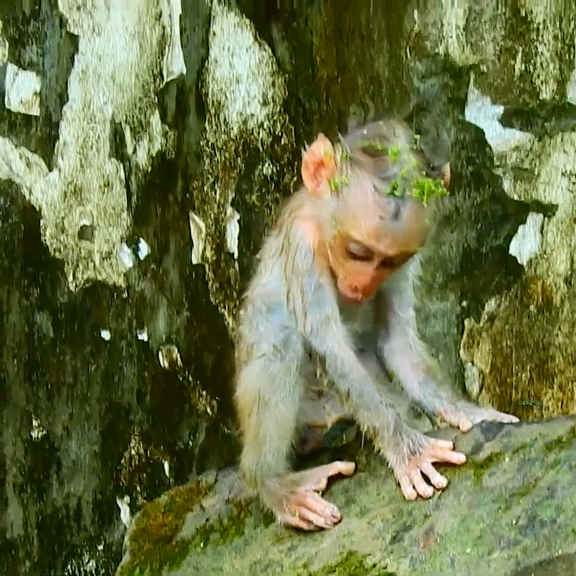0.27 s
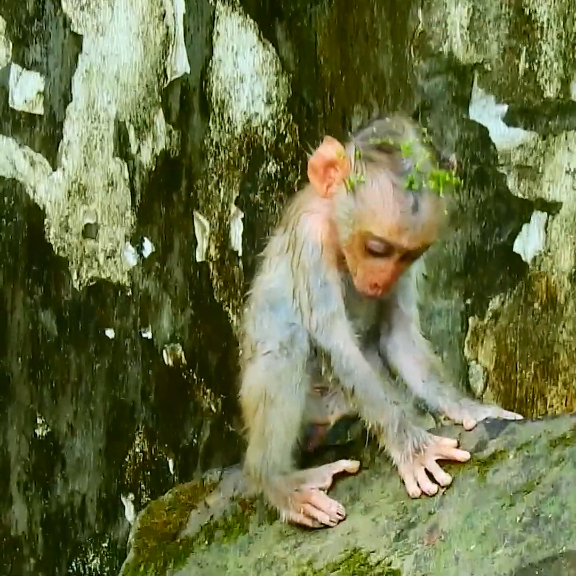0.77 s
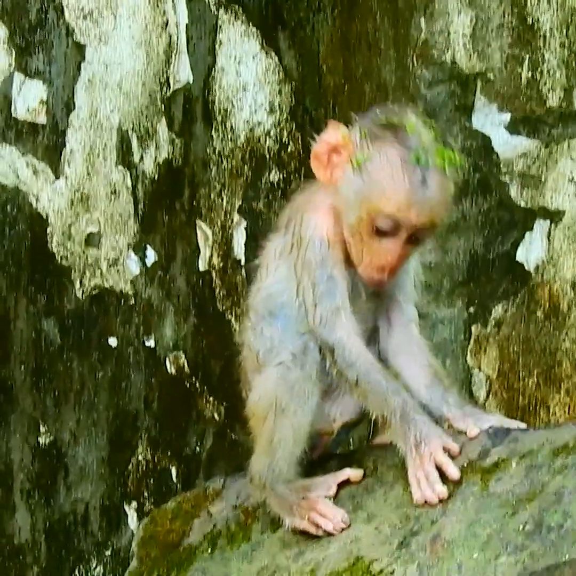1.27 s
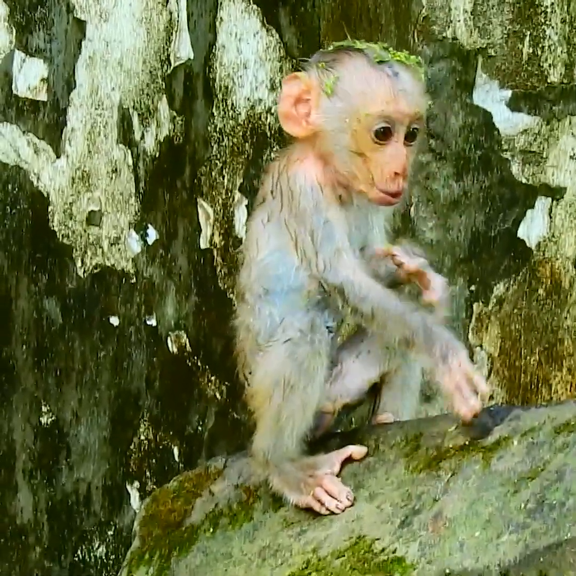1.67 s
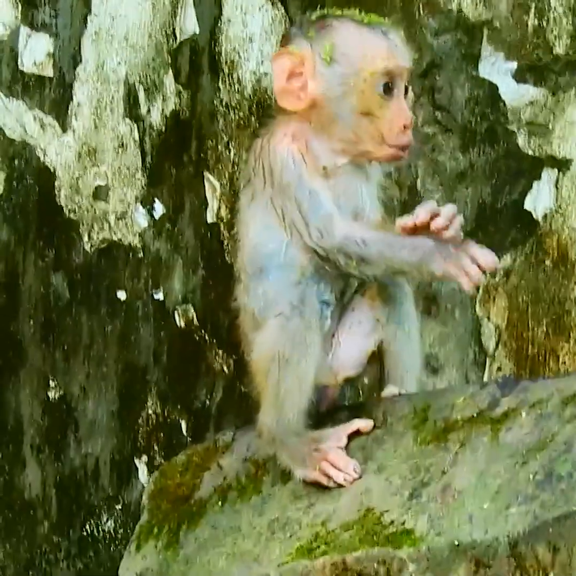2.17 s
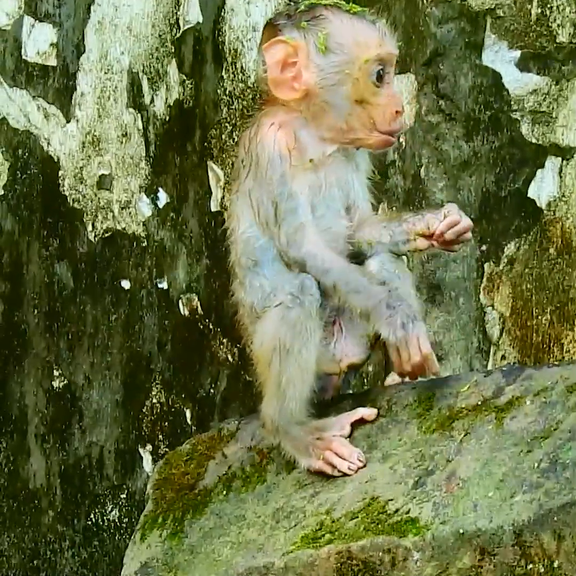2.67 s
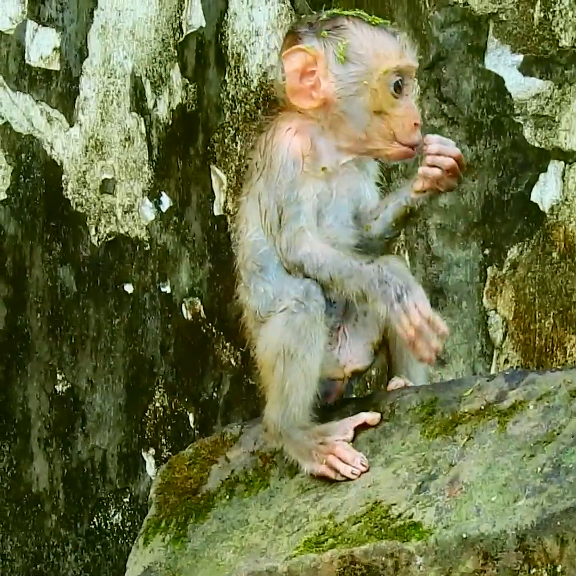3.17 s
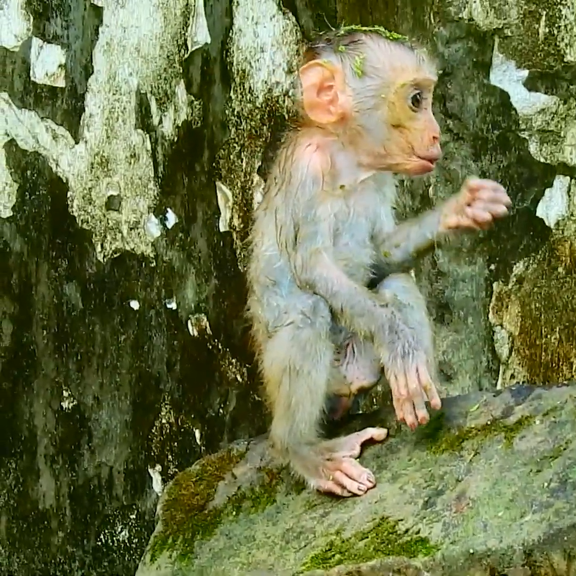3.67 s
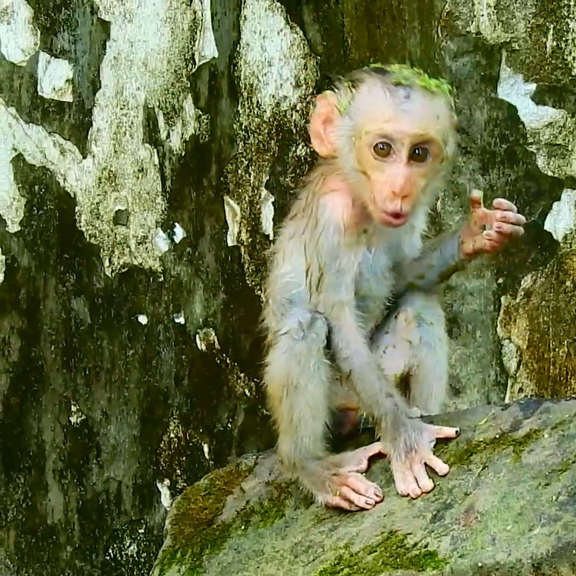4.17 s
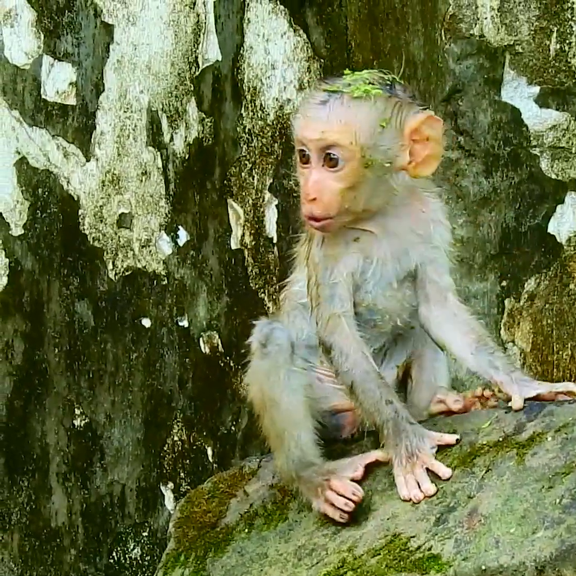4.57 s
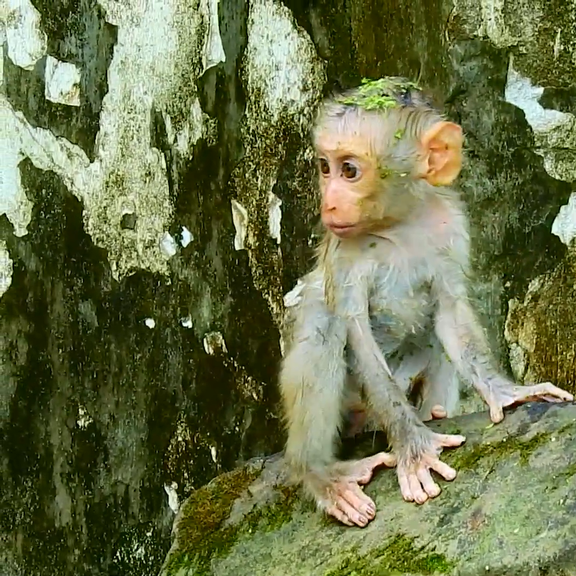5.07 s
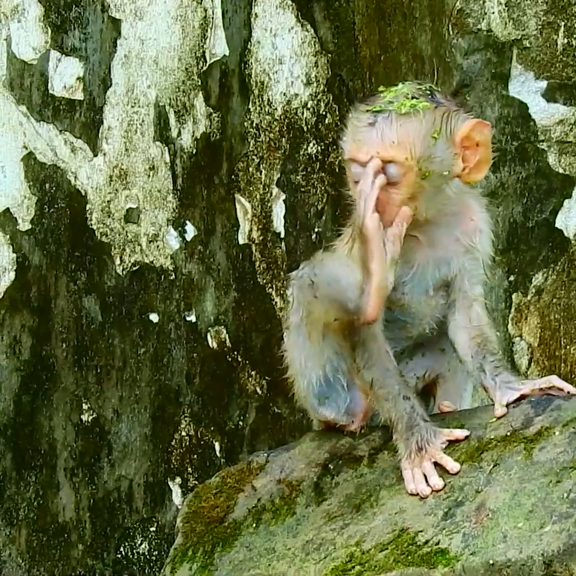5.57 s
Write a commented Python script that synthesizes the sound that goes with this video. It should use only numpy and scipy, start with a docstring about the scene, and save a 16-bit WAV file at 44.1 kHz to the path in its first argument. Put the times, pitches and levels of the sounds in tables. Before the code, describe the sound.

Repeated high plaintive monkey coos, some ending in a slight rasp, ring off rock, then stop, leaving quiet insect hiss and distant forest air.

```python
"""Baby monkey cooing among rocks

A baby monkey on a rock coos eleven times: vocal folds as sine oscillators on arches of pitch, near pure.
In some calls a second oscillator and noise break the tone into a rasp.
Delayed copies off rock and wall make each glide swell and dip; a diffuse noise tail rings briefly.
Behind: narrow-band noise for shrill insects, gliding sines for faint chirps, dull noise for a low rumble.
Close by: a few dry ticks of crackle through short modes, and soft scuffs of swelling noise."""
import sys
import numpy as np
from scipy import signal
from scipy.fft import rfft, irfft
from scipy.io import wavfile

SR = 44100
rng = np.random.default_rng(int(sys.argv[2]) if len(sys.argv) > 2 else 0)


def digitize_waveform(pressure):
    """Quantize a signal to 16-bit integers and store it at the path in sys.argv[1].

    Rows of a 2-D input are taken as channels; values are limited to [-1, 1].
    """
    field = np.atleast_2d(pressure).T
    bounded = np.clip(field, -1, 1)
    quanta = np.round(bounded * 32767).astype(np.int16)
    wavfile.write(sys.argv[1], SR, quanta)


N = 256617
TIME = np.arange(N) / SR
FREQS = np.maximum(np.fft.rfftfreq(N, 1 / SR), 1)


def undb(db):
    """Decibels to gain."""
    return 10 ** (np.asarray(db) / 20)


def unit(x):
    """Scale to rms 1."""
    return x / np.sqrt(np.mean(x ** 2))


def colour(points, hz):
    """Gain at the given frequencies of a (Hz, dB) spectrum, interpolated over log frequency."""
    points_hz, points_db = np.transpose(points)
    return undb(np.interp(np.log(hz), np.log(points_hz), points_db))


def band(centre_hz, width_hz):
    """Gain of a resonance with steep skirts, half at about width_hz / 2 off centre."""
    return 1 / (1 + ((FREQS ** 2 - centre_hz ** 2) / (FREQS * width_hz)) ** 2)


def noise(gain, likeness=0):
    """Left and right noise of rms about 1 with the given spectrum and correlation."""
    white = rng.standard_normal((2, N))
    mid, side = unit(irfft(rfft(white) * gain, N))
    likeness = np.clip(likeness, -1, 1)
    return np.sqrt((1 + likeness) / 2) * mid + np.sqrt((1 - likeness) / 2) * np.array([side, -side])


def wander(rate_hz):
    """Smooth random curve of rms 1 that moves about rate_hz times a second."""
    white = rng.standard_normal(N)
    return unit(irfft(rfft(white) / (1 + (FREQS / rate_hz) ** 4), N))


def gate(start_s, end_s, edge_s):
    """Straight ramps centred on the two times; a spell shorter than edge_s stays below 1."""
    return np.clip(np.minimum(TIME - start_s, end_s - TIME) / edge_s + .5, 0, 1)


def turn(hz):
    """Phase of an oscillator in rad, the running sum of its frequency."""
    return 2 * np.pi * np.cumsum(hz) / SR


def delay(x, delay_s):
    """The sound delay_s later (earlier if negative), to the nearest sample."""
    first = SR - round(delay_s * SR)
    return np.pad(x, SR)[first:first + N]


# Spectrum of the forest air. Each row: frequency in Hz, relative density in dB.
AIR_SPECTRUM = [(20, -16), (50, -10.5), (85, -5), (115, -12), (165, -17.5), (300, -14), (450, -23),
                (700, -18.5), (1400, -24), (2600, -27), (5000, -29.5), (6300, -39), (8000, -40.5),
                (10000, -49.5), (15500, -49.5)]


def forest(rumble_db=-38, air_db=-49, swell_db=3.0, stir_hz=450, stir_width_hz=170, stir_db=-54):
    """Shaped noise: a low distant rumble, soft air that swells a little, a hollow stirring in it."""
    spectrum = colour(AIR_SPECTRUM, FREQS)
    low = 1 / (1 + (FREQS / 160) ** 4)
    rumble = noise(spectrum * low, .22) * undb(swell_db * wander(10))
    stir = noise(band(stir_hz, stir_width_hz), .1) * undb(2.2 * wander(7))
    air = noise(spectrum * (1 - low), .12) * undb(1.3 * wander(6))
    return undb(rumble_db) * rumble + undb(stir_db) * stir + undb(air_db) * air


# Spectrum of the massed insects. Each row: frequency in Hz, relative density in dB.
CHORUS_SPECTRUM = [(2600, -16), (3100, -9.5), (3300, -6.5), (3650, 3), (4150, -4), (4700, 5.5), (4950, 3.5),
                   (5300, 3.5), (5480, -44), (5700, -47.5)]


def insects(chorus_db=-43, throb_db=1.5):
    """Two close narrow noise bands throb together over the hiss of many other insects."""
    high_line = undb(-40.0) * noise(band(5255, 60))
    low_line = undb(-44) * noise(band(5175, 90))
    chorus = undb(chorus_db + .6 * wander(6)) * noise(colour(CHORUS_SPECTRUM, FREQS))
    return (high_line + low_line) * undb(throb_db * wander(25)) + chorus


# Faint high chirps.
# Each row: start in seconds, end in seconds, start pitch in Hz, end pitch in Hz, peak in dB before the haze.
CHIRP_GLIDES = [(1.1, 1.266, 4770, 5230, -35.5), (2.57, 2.694, 4650, 4040, -39),
                (4.01, 4.108, 4450, 4040, -40), (4.05, 4.207, 4760, 5020, -37),
                (4.48, 4.627, 4580, 5100, -35), (5.08, 5.297, 2915, 3790, -43.5),
                (5.66, 5.82, 4400, 4160, -45.5)]


def chirps():
    """Distant whistles, sines gliding straight in pitch, blurred by the trees."""
    haze = .4 + .9 * noise(1 / (1 + (FREQS / 70) ** 2))
    out = 0
    for start_s, end_s, from_hz, to_hz, level_db in CHIRP_GLIDES:
        along = np.clip((TIME - start_s) / (end_s - start_s), 0, 1)
        phase = turn(from_hz + (to_hz - from_hz) * along) + rng.uniform(0, np.pi, (2, 1))
        swell = np.sqrt(4 * along * (1 - along))
        out = out + undb(level_db) * swell * np.sin(phase)
    return haze * out


# Soft scuffs and low swells.
# Each row: middle in seconds, length between 1/e points in seconds, centre in Hz, width in Hz,
# level at the middle in dB before the grain.
SCUFF_SWELLS = [(0.816, 0.5, 420, 251, -43.5), (1.458, 0.4, 450, 486, -42), (1.594, 0.32, 300, 149.6, -45),
                (1.809, 0.22, 450, 358.7, -42), (1.799, 1, 92, 49.46, -38.5),
                (2.195, 0.078, 450, 398.6, -36), (2.233, 0.067, 210, 129, -32),
                (2.22, 0.16, 2000, 2310, -43), (2.704, 0.1, 420, 196.2, -41.5),
                (3.754, 0.073, 400, 248.2, -41.5), (4.736, 0.48, 75, 45, -41.5)]


def scuffs(grain_db=3, soft_hz=4500):
    """Uneven swells of dull noise: short scuffs and longer, deeper surges."""
    grain = undb(grain_db * wander(120))
    soft = 1 / (1 + (FREQS / soft_hz) ** 6)
    out = 0
    for middle_s, length_s, centre_hz, width_hz, level_db in SCUFF_SWELLS:
        swell = np.exp(-(2 * (TIME - middle_s) / length_s) ** 2)
        out = out + undb(level_db) * swell * noise(soft * band(centre_hz, width_hz), 0.18)
    return grain * out


# Dry ticks. Each row: start in seconds, peak in dB, decay time of the crackle in seconds.
TICK_EVENTS = [(0.401, -8.5, 0.00092), (2.956, -18.5, .003), (2.972, -16, 0.0037), (3.371, -19, 0.0043),
               (3.381, -24, 0.0053)]
# Modes a tick rings. Each row: frequency in Hz, width in Hz, level in dB before the bandpass.
TICK_RESONANCES = [(3120, 560, -6.5), (4550, 360, 0.5), (5100, 300, -11.5), (8500, 900, -27)]


def ticks(low_hz=2600, high_hz=7000):
    """Each tick is a click and a tiny decaying crackle that ring a few short damped modes."""
    t = TIME[:SR // 20]
    ring = 0
    for hz, width_hz, level_db in TICK_RESONANCES:
        ring = ring + undb(level_db) * np.exp(-np.pi * width_hz * t) * np.sin(2 * np.pi * hz * t)
    ring = signal.sosfilt(signal.butter(4, [low_hz, high_hz], "bandpass", fs=SR, output="sos"), ring)
    out = np.zeros((2, N))
    for start_s, peak_db, decay_s in TICK_EVENTS:
        crackle = 0.48 * rng.standard_normal((2, len(t))) * np.exp(-t / decay_s)
        crackle[:, 0] += 1
        tick = signal.fftconvolve(crackle, ring[None], axes=1)[:, :len(t)]
        i = int(start_s * SR)
        out[:, i:i + len(t)] += undb(peak_db) * tick / np.abs(tick).max()
    return out


# Colour of the diffuse ring. Each row: frequency in Hz, relative level in dB.
RING_SPECTRUM = [(600, -4.5), (860, 2), (1020, -2), (1500, 1), (1700, 17), (2100, 8), (2700, 7.5), (9000, -20)]


def rocks(x, wet_db=-21.5, t60_s=1.0, slap_s=0.076, slap_width_s=0.04, slap_db=2):
    """A thin noise tail off stone and trees, unrelated left and right, with a blurred slap from farther off."""
    onset = np.clip((TIME - .025) / 0.057, 0, 1)
    decay = undb(-60 * TIME / t60_s)
    slap = undb(slap_db) * np.exp(-((TIME - slap_s) / slap_width_s) ** 2)
    tail = (noise(colour(RING_SPECTRUM, FREQS)) * (onset * decay + slap))[:, :SR]
    tail = tail / np.sqrt(np.sum(tail ** 2))
    return undb(wet_db) * signal.fftconvolve(x, tail, axes=1)[:, :N]


# The coos, each one arch of pitch before its final drop.
# Each row: start in seconds, top in seconds, end in seconds, start pitch in Hz, top pitch in Hz, end pitch in Hz,
# fundamental at the top in dB before FUNDAMENTAL_DB, its swell on the way up in dB, release in seconds.
COO_ARCHES = [(-0.12, 0.019, 0.135, 841, 1018, 910, -14.7, 22, 0.07),
              (0.392, 0.526, 0.61, 811, 970, 827, -14.6, 8, 0.064),
              (0.86, 1.015, 1.09, 761, 950, 868, -13.4, 15, 0.07),
              (1.28, 1.43, 1.505, 748, 1005, 890, -13.2, 15, 0.058),
              (1.66, 1.79, 1.865, 780, 1005, 890, -17.7, 4, 0.037),
              (2.013, 2.132, 2.225, 777, 959, 860, -15.1, 11, 0.062),
              (2.39, 2.545, 2.61, 795, 910, 842, -18.3, 1, 0.06),
              (2.92, 3.078, 3.15, 746, 885, 778, -14.4, 22, 0.07),
              (3.328, 3.49, 3.535, 780, 899, 793, -17.0, 2, 0.07),
              (3.768, 3.943, 3.995, 747, 868, 771, -15.9, 17, 0.06),
              (4.203, 4.391, 4.445, 730, 858, 815, -13.9, 18, 0.041)]
RISE_BEND, FALL_BEND = 1.3, 1.7  # powers that round the two flanks of the arch
ATTACK_S, OVERTONE_RELEASE_S = .02, 0.024
DROP_HZ, DROP_S = 70, .012  # the pitch slips as each coo gives out


def coo(arch, mouth):
    """Pitch and effort climb to the top, then pitch sags. Rows: s, Hz, tone gain, overtone gain, lifts in dB."""
    start_s, top_s, end_s, start_hz, top_hz, end_hz, tone_db, tone_swell_db, release_s = arch
    over_db, over_swell_db, *lifts_db = mouth
    t = np.linspace(start_s, end_s, 256)
    rise = np.clip((top_s - t) / (top_s - start_s), 0, 1)  # 1 at the start, 0 from the top on
    fall = np.clip((t - top_s) / (end_s - top_s), 0, 1)
    hz = top_hz - (top_hz - start_hz) * rise ** RISE_BEND - (top_hz - end_hz) * fall ** FALL_BEND
    hz = hz - DROP_HZ * np.exp((t - end_s) / DROP_S)
    attack = np.clip((t - start_s) / ATTACK_S, 0, 1)
    tone_release = np.clip((end_s - t) / release_s, 0, 1)
    over_release = np.clip((end_s - t) / OVERTONE_RELEASE_S, 0, 1)
    tone_gain = undb(tone_db - tone_swell_db * rise ** 2) * attack * tone_release
    over_gain = undb(over_db - over_swell_db * rise ** 2) * attack * over_release
    return np.column_stack([t, hz, tone_gain, over_gain, np.tile(lifts_db, (len(t), 1))])


def curves(rows):
    """The columns of a (s, value, ..) table at every sample."""
    times_s, *columns = np.transpose(rows)
    return [np.interp(TIME, times_s, column) for column in columns]


# Mouth of each coo in turn. Each row: overtones at the top in dB, their swell on the way up in dB,
# lift of the second harmonic in dB, lift of the third in dB, lift of the sixth and higher in dB.
MOUTH_SHAPES = [(-31.5, 31, -11, -3.5, 1), (-33.5, 24, 0.5, -6, 2), (-29.5, 30, -5.5, -10, -1.5),
                (-31, 33, -3.5, -1, 1.5), (-35.5, 19.5, 8, -1.5, 2.5), (-33.5, 23.5, 1, 1, -1),
                (-36.5, 11, 1, -3.5, -1.5), (-40.5, 3.5, 5, -1.5, -1.5), (-38.5, 15.5, 10, -0.5, 2.5),
                (-36.5, 17, 4, -1.5, -0.5), (-37.5, 21, 6.5, 3, 2.5)]
# Colour of the overtones. Each row: frequency in Hz, relative level in dB.
THROAT_SPECTRUM = [(1400, -27.5), (1610, -11), (1690, -6.5), (1880, -6), (2050, -5), (2250, -0.5),
                   (2430, -0.5), (2560, -8), (2680, -2.5), (2820, -11.5), (2970, -3.5), (3350, -18.5),
                   (3850, -11.5), (5450, -12), (5950, -17.5), (6650, -15), (7250, -25), (8500, -30),
                   (9300, -58)]
# Where the voice breaks; short spells do not reach full depth.
# Each row: start in seconds, end in seconds, second oscillator in Hz, its depth 0-1, rasp 0-1, pitch jump in Hz.
VOICE_BREAKS = [(0.567, 0.624, 761, 0.02, 0.28, -4), (1.079, 1.077, 761.6, 0.6, 0.21, 2),
                (1.413, 1.498, 736, 0.03, 0.16, 2.5), (1.75, 1.824, 734, 0.58, 0.42, 39.5),
                (1.835, 1.853, 770, 0.2, 1, -1.5), (2.082, 2.146, 781, 0.33, 0.23, 65.5),
                (2.147, 2.214, 716, 0.15, .4, 55.5), (2.517, 2.596, 712, 0.04, 0.18, 1.5),
                (3.126, 3.188, 754.4, 0.67, 0.5, -1.5), (3.432, 3.466, 711, 0.09, 0.04, 47),
                (3.472, 3.504, 671, 0.3, 0.46, 60.5)]
FUNDAMENTAL_DB = 0.61
BREAK_DUCK_DB = 15.5  # tone lost per unit depth of the second oscillator
HISS_DB, RASP_DB = -16, -3  # turbulence always present, and added by full rasp
PATCHY_DB = 5.5


def monkey():
    """Vocal folds sing a strong fundamental and weak overtones; in a break a second oscillator beats with them."""
    arches = np.vstack([coo(*rows) for rows in zip(COO_ARCHES, MOUTH_SHAPES)])
    hz, tone_gain, over_gain, second_db, third_db, bright_db = curves(arches)
    spells = np.array([gate(row[0], row[1], 0.013) for row in VOICE_BREAKS])
    depth, rasp, jump_hz = np.transpose(VOICE_BREAKS)[3:] @ spells
    hz = hz + jump_hz
    middles_s = [(row[0] + row[1]) / 2 for row in VOICE_BREAKS]
    second_hz = np.interp(TIME, middles_s, [row[2] for row in VOICE_BREAKS])
    # in a rasp the cycles stumble in length and size
    stumble = 0.031 * rasp * wander(350)
    shimmer = 1 + 0.17 * rasp * wander(320)
    folds = turn(hz * (1 + 0.0051 * wander(140) + stumble))
    second = turn(second_hz * (1 + 0.0083 * wander(220)))
    tone = (np.sin(folds) + depth * np.sin(second)) * undb(FUNDAMENTAL_DB - BREAK_DUCK_DB * depth)
    # the two oscillators mix: sum tones fill the gap below each overtone
    shares = [1 - depth / 2, 2.5 * depth, 1.7 * depth]
    overtones = 0
    for k in range(2, 12):
        # rough stone scatters the overtones: each flickers on its own and shifts in phase between microphones
        patches_db = PATCHY_DB * wander(16)
        ears = .9 * wander(8) * np.array([[1], [-1]])
        gain = undb(patches_db + second_db * (k == 2) + third_db * (k == 3) + bright_db * (k > 5))
        for m, share in enumerate(shares):
            phase = (k - m) * folds + m * second + rng.uniform(0, 2 * np.pi) + ears
            throat = colour(THROAT_SPECTRUM, (k - m) * hz + m * second_hz)
            overtones = overtones + share * throat * np.sin(phase) * gain
    # turbulence at the folds pulses once a cycle, through the same throat
    highpass = FREQS ** 2 / (FREQS ** 2 + 1200 ** 2)
    air = noise(colour(THROAT_SPECTRUM, FREQS) * highpass) * (1 + 0.33 * np.cos(folds))
    air = air * (undb(HISS_DB) + undb(RASP_DB) * rasp)
    # the harder the rasp, the more of the overtones gives way to noise
    clear = np.clip(1 - rasp, 0, 1)
    fundamental = shimmer * np.sqrt(2) * tone_gain * tone
    return fundamental, shimmer * over_gain * (np.sqrt(2) * clear * overtones + air)


# Way from mouth to microphones for each coo in turn; it shifts as the monkey moves.
# Each row: lead of the left microphone in seconds, rock echo gain 0-1, its delay left in seconds,
# right in seconds, wall echo gain 0-1, its delay left in seconds, right in seconds.
ECHO_PATHS = [(-0.00015, 0.9, 0.00324, 0.00632, 0.32, 0.01648, 0.01221),
              (0.00036, 0.9, 0.00388, 0.00607, 0.28, 0.01612, 0.02346),
              (0.00013, 0.68, 0.00722, 0.0095, 0.27, 0.01957, 0.02708),
              (-0.0006, 0.65, 0.00838, 0.00726, 0.35, 0.01211, 0.0172),
              (-0.00014, 0.62, 0.00841, 0.00623, 0.33, 0.012, 0.0108),
              (0.00033, 0.9, 0.00941, 0.00836, 0.49, 0.01438, 0.01445),
              (0.00018, 0.9, 0.00822, 0.00938, 0.43, 0.0335, 0.02252),
              (0.00023, 0.69, 0.00964, 0.0051, 0.6, 0.01292, 0.01171),
              (0.00045, 0.9, 0.00823, 0.01041, 0.6, 0.01682, 0.01906),
              (-0.00042, 0.9, 0.00495, 0.00623, 0.6, 0.03125, 0.01778),
              (0.00025, 0.39, 0.00743, 0.00649, 0.14, 0.01554, 0.02928)]


def rock_face(voice):
    """Direct sound plus echoes off rock and wall: as pitch glides they swell and cancel, unlike left and right."""
    out = np.zeros((2, N))
    for (start_s, _, end_s, *_), path in zip(COO_ARCHES, ECHO_PATHS):
        lead_s, rock, rock_left_s, rock_right_s, wall, wall_left_s, wall_right_s = path
        call = voice * ((TIME >= start_s) & (TIME <= end_s))
        echoes_s = [(rock_left_s, wall_left_s), (rock_right_s, wall_right_s)]
        for side, (rock_s, wall_s) in enumerate(echoes_s):
            direct = delay(call, lead_s * (side - .5))
            out[side] += direct + rock * delay(direct, rock_s) + wall * delay(direct, wall_s)
    return out


# Brief dips of the fundamental. Each row: middle in seconds, half width at 1/e in seconds, depth in dB.
FUNDAMENTAL_DIPS = [(0.453, 0.012, 10.5), (0.522, 0.0056, 21), (1.389, 0.0037, 16.5), (1.716, 0.0085, 2),
                    (2.991, 0.011, 6.5), (3.073, 0.0031, 21), (3.131, 0.0056, 14), (3.342, 0.0059, 7.5)]


def dips():
    """Gain of the brief dips, bell-shaped in dB."""
    return undb(-sum(depth_db * np.exp(-((TIME - middle_s) / half_width_s) ** 2)
                     for middle_s, half_width_s, depth_db in FUNDAMENTAL_DIPS))


def scene():
    """The monkey and the small close sounds, with their ring, in front of the forest."""
    fundamental, overtones = monkey()
    voice = rock_face(fundamental) * dips() + overtones
    near = voice + ticks() + scuffs()
    return near + rocks(near) + chirps() + insects() + forest()


def record(dry, top_hz=15750):
    """The recorder cuts the top with a steep elliptic lowpass."""
    return signal.sosfilt(signal.ellip(8, .2, 70, top_hz, fs=SR, output="sos"), dry)


dry = scene()
out = record(dry)
digitize_waveform(out)
```